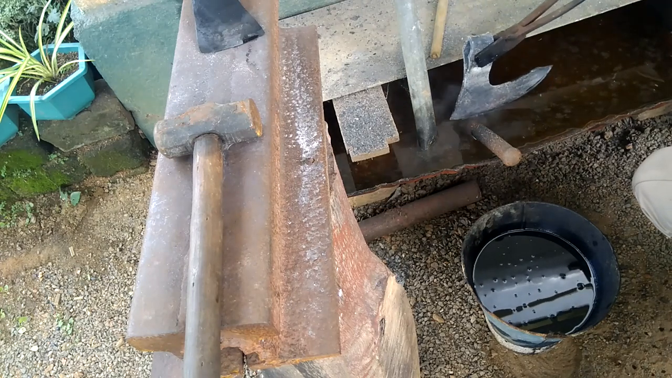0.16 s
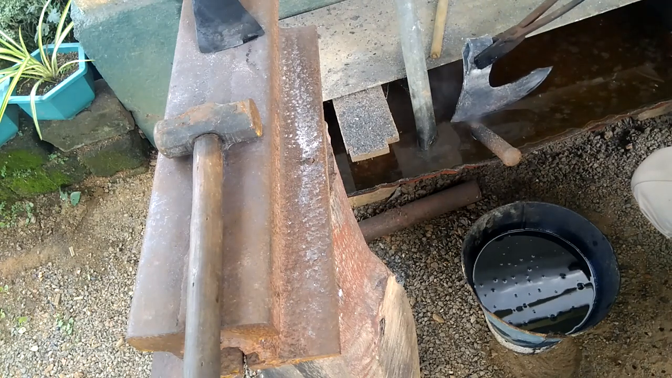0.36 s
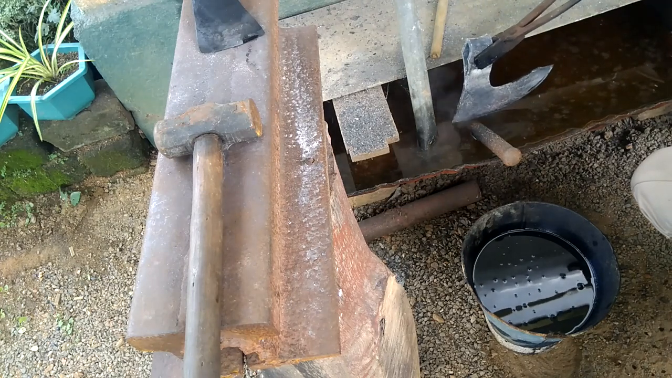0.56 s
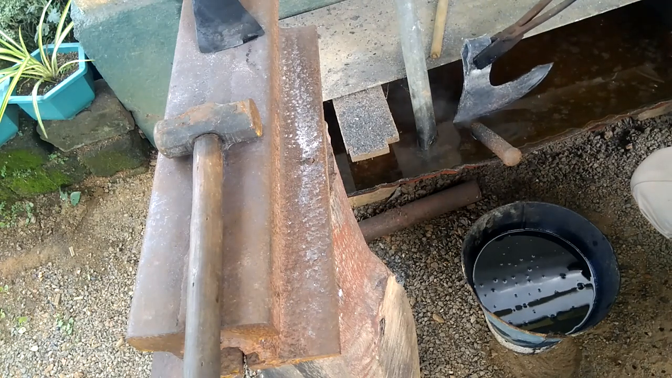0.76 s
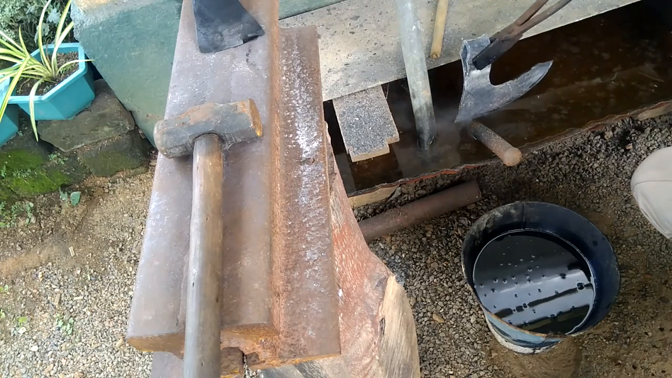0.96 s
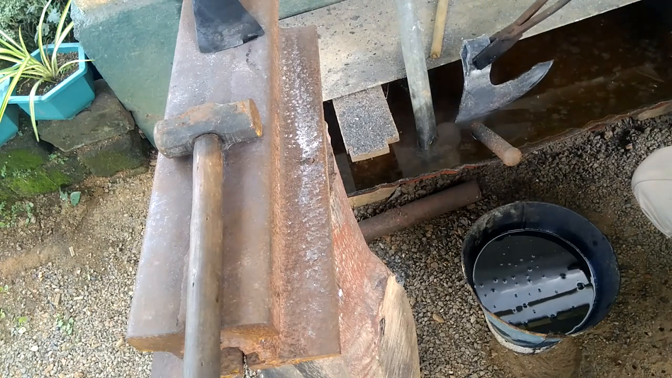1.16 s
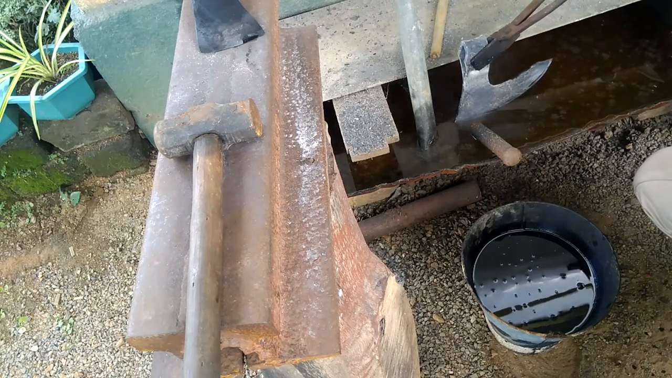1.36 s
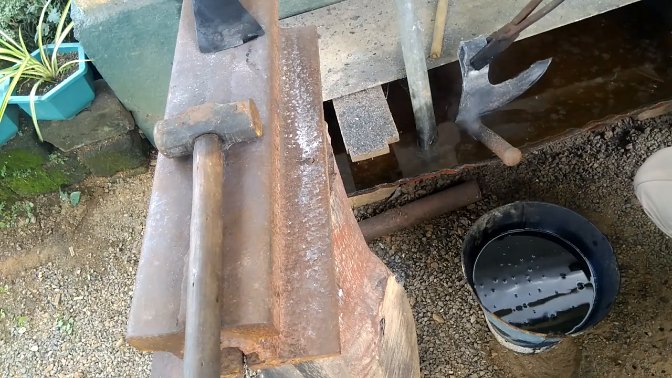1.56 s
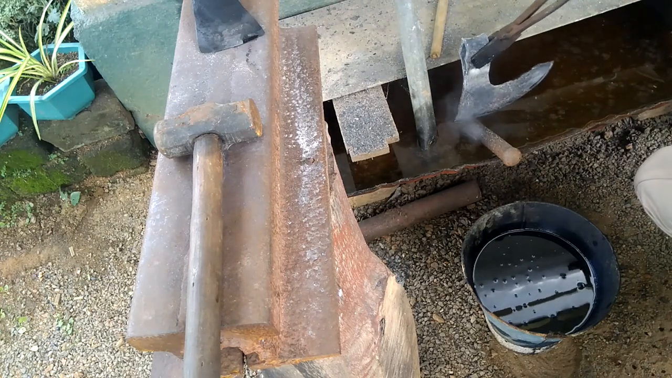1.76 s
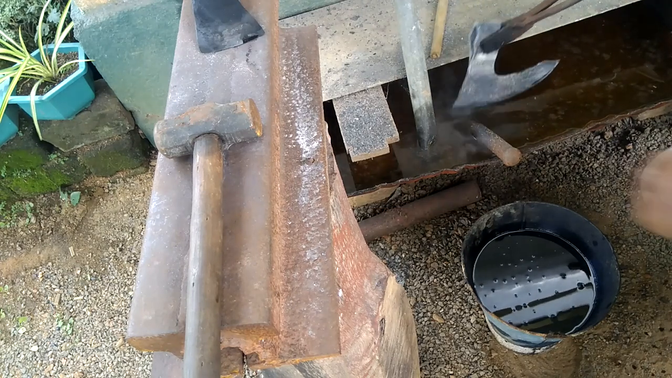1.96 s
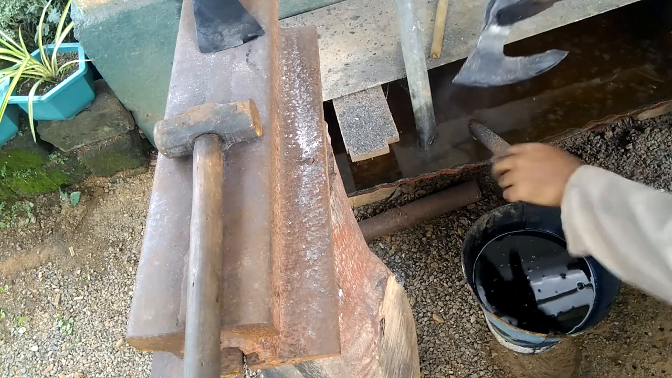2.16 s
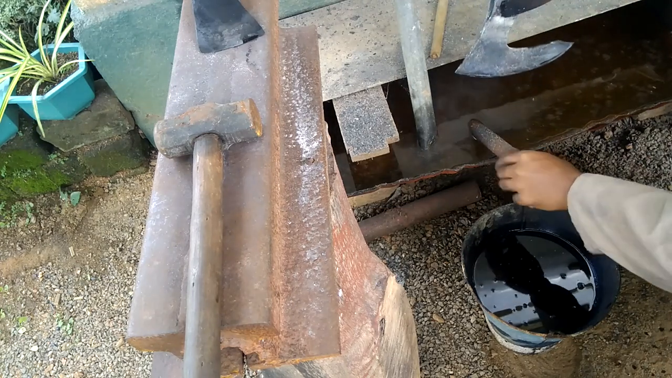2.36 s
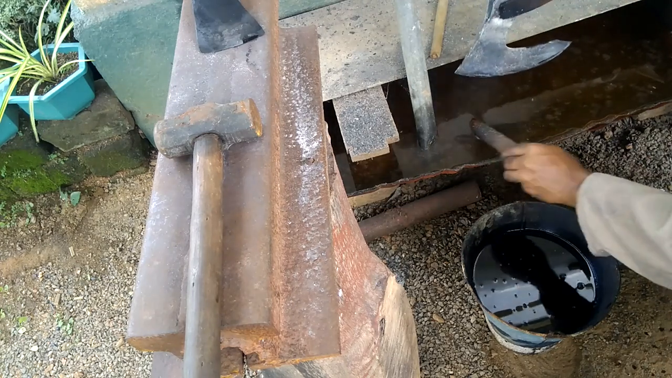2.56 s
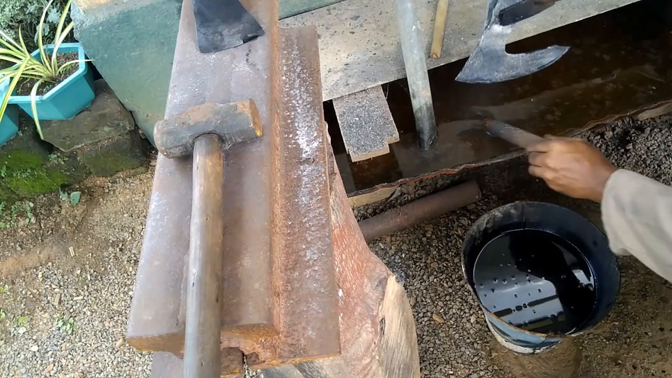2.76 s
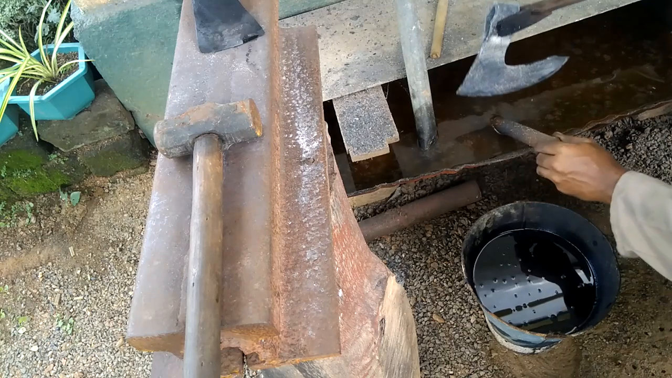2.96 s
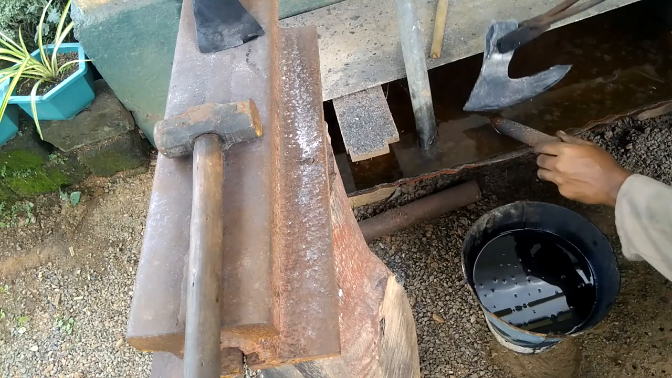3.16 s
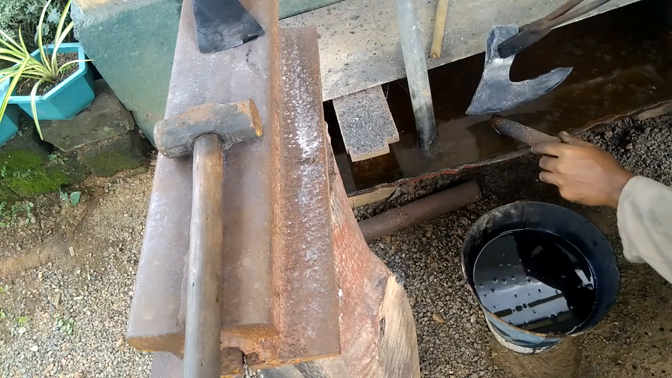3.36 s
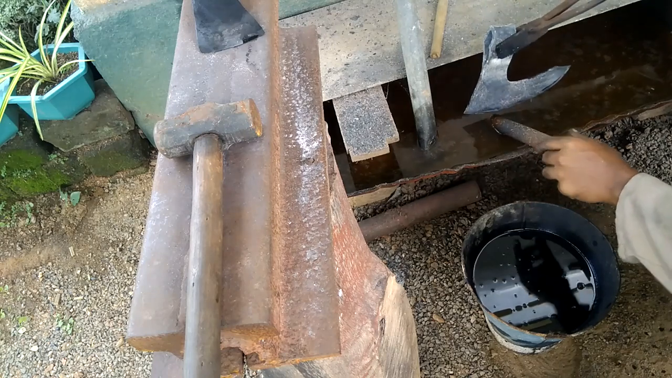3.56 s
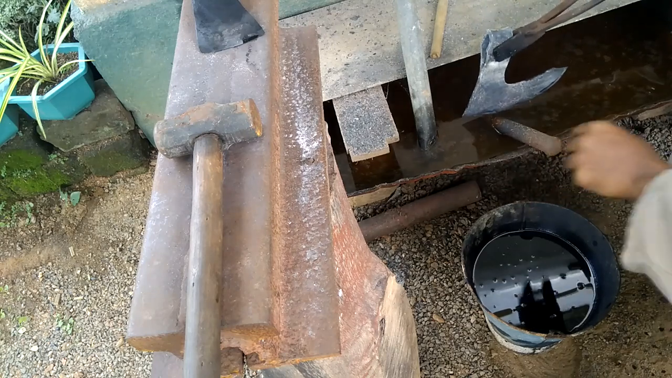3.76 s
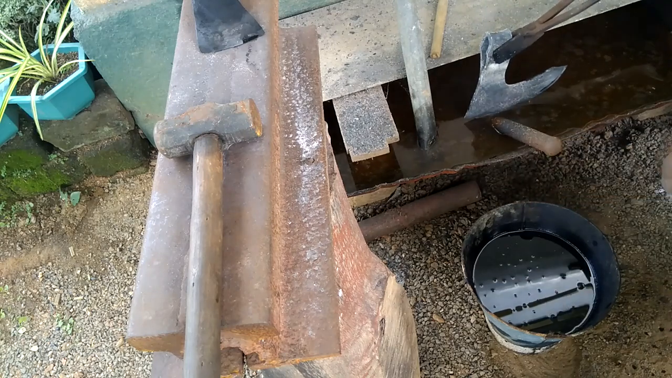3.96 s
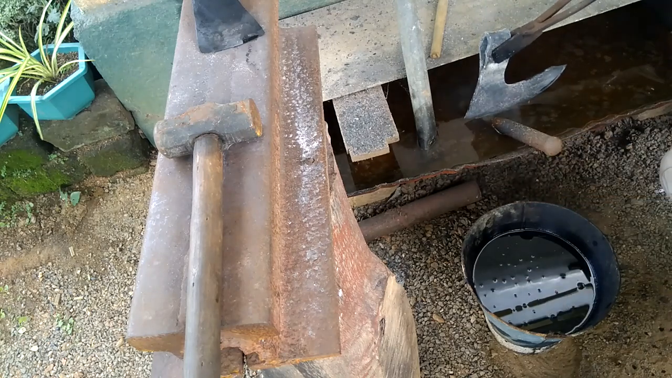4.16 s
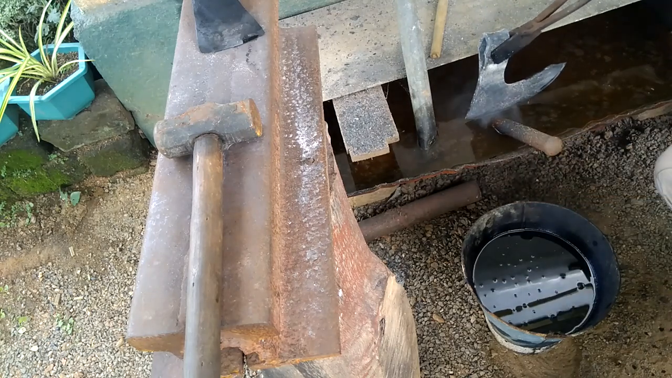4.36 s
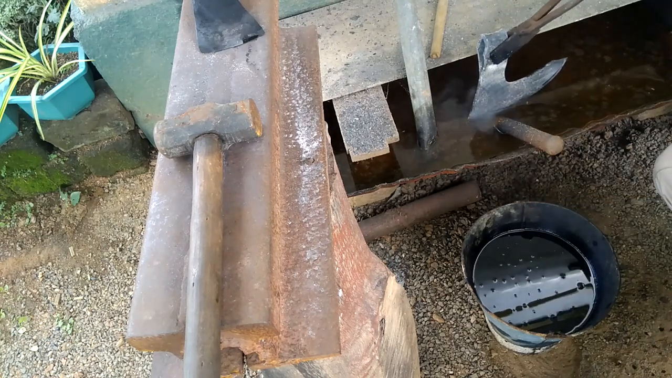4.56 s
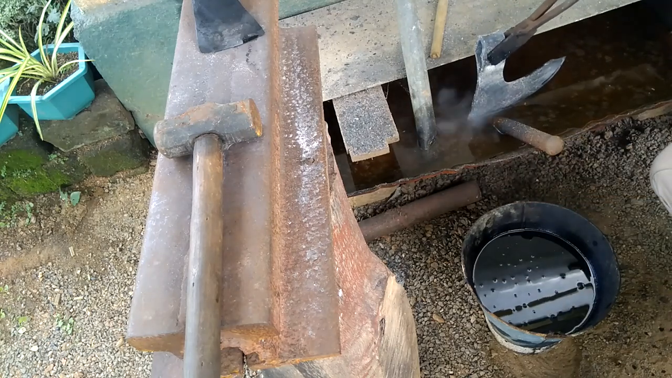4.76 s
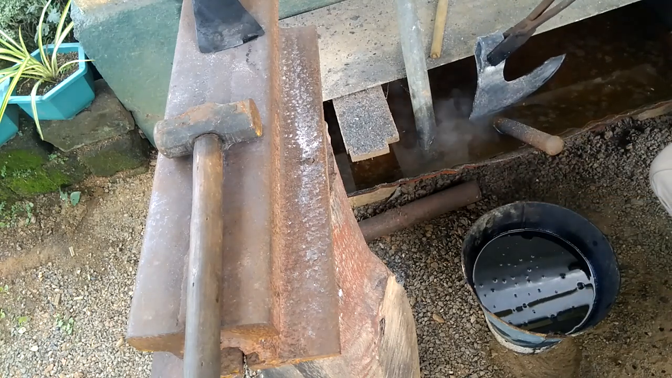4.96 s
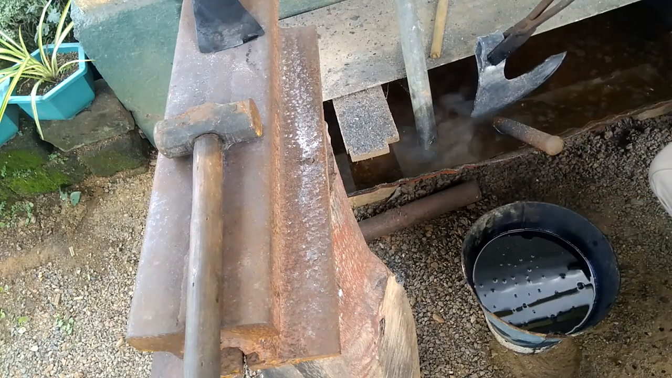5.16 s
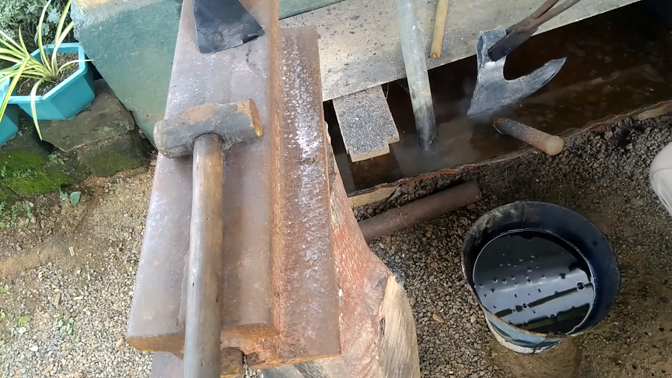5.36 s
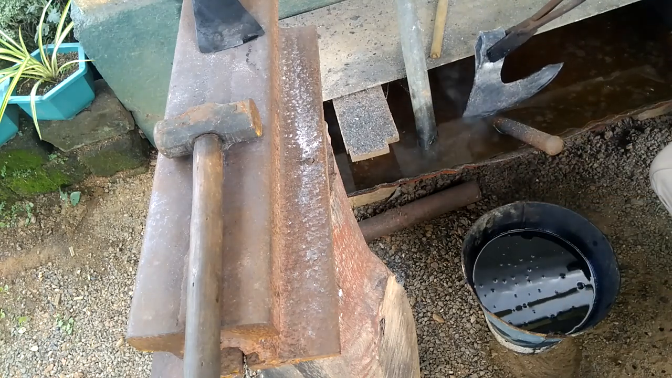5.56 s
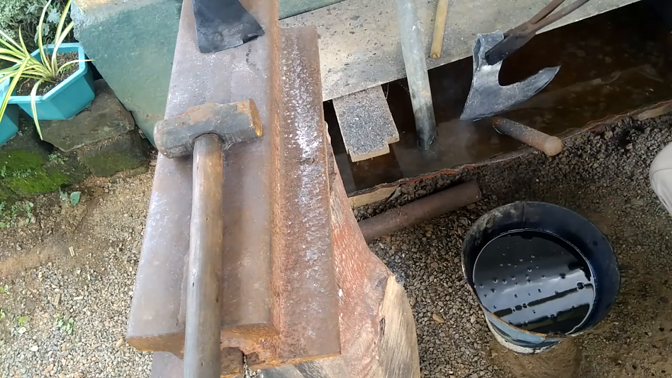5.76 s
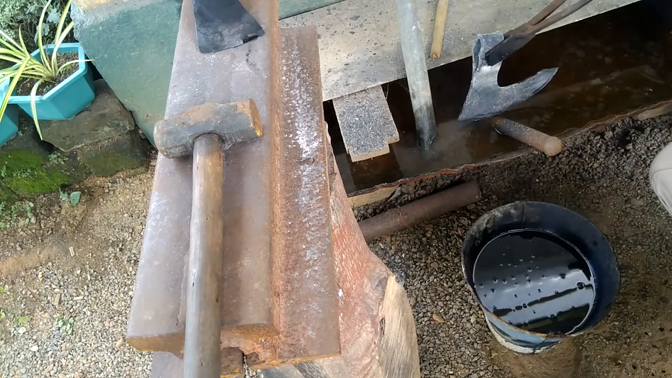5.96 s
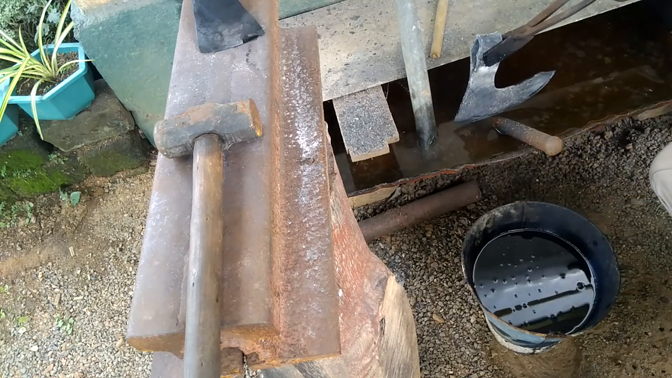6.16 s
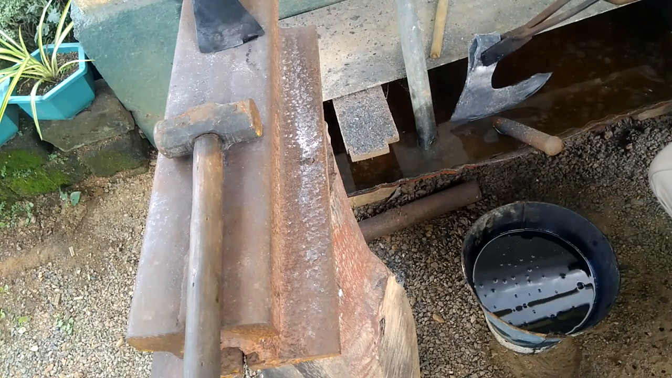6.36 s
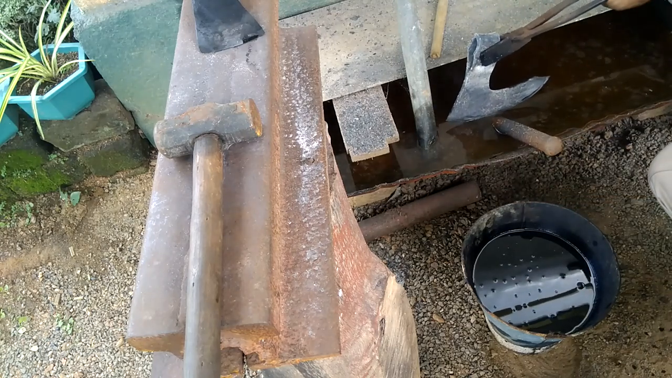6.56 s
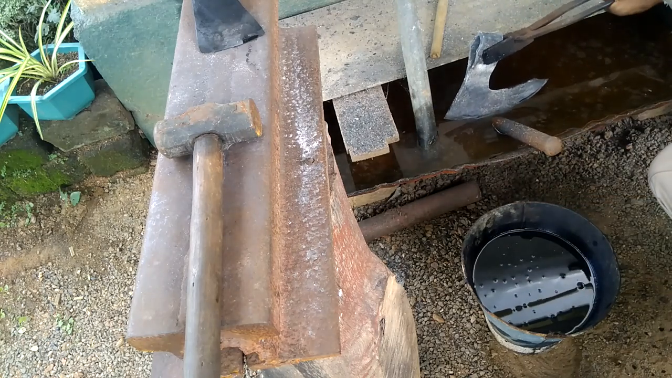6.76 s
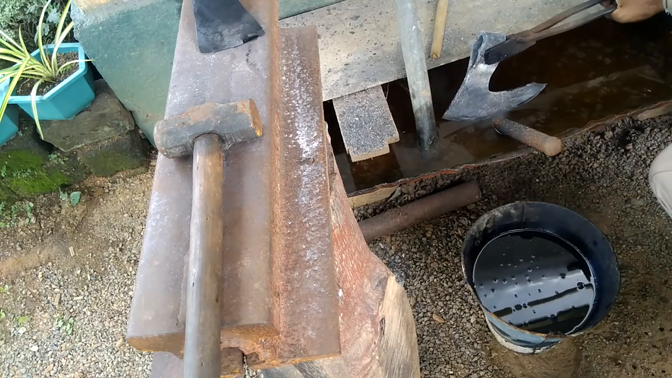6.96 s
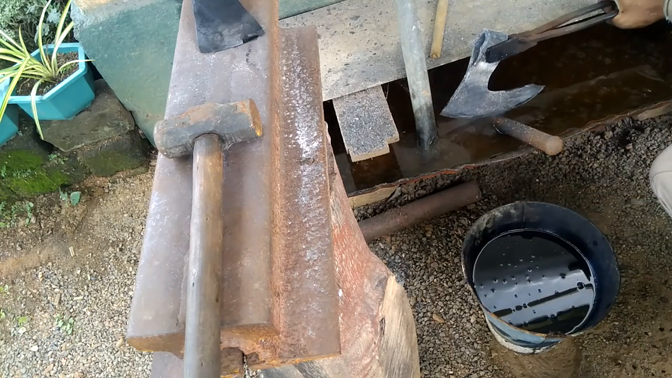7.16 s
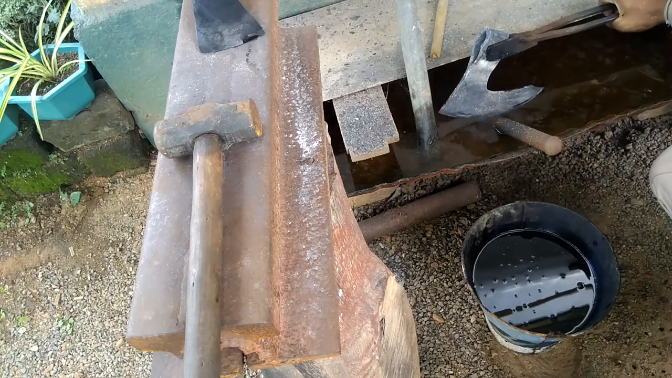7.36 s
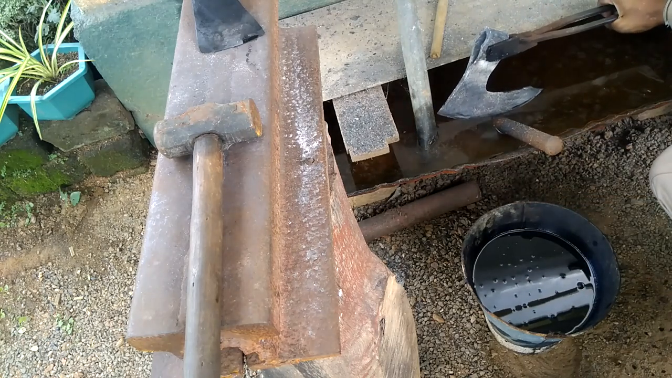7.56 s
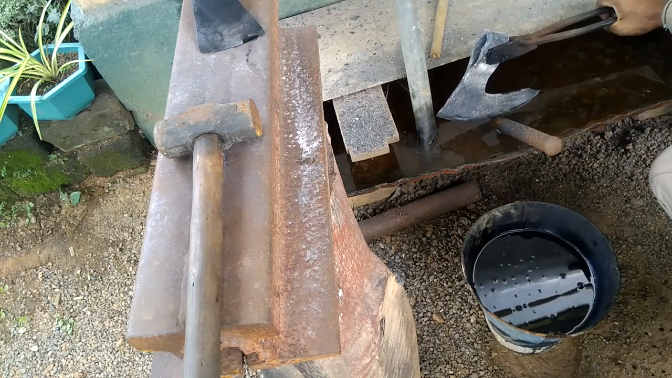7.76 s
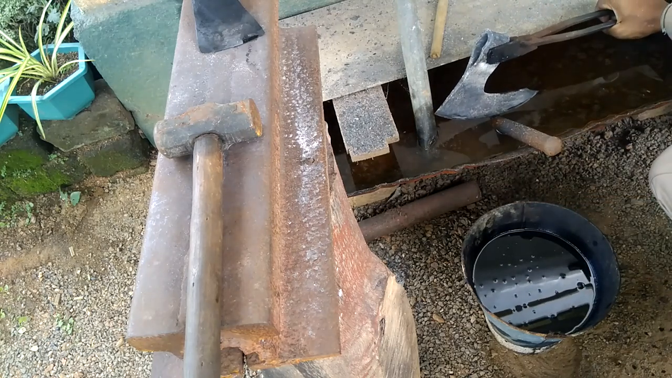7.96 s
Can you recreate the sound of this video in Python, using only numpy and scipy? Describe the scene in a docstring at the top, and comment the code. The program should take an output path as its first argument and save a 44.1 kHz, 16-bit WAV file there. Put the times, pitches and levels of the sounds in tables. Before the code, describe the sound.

Hot steel sizzles in a water trough, fades around a brief wooden rub and glug, then sizzles again, over low wind rumble.

```python
"""An open workshop, one mono microphone close to a water trough. A red-hot axe head is dipped twice:
its edge boils the water, and collapsing steam bubbles make a dense, crackling hiss that stutters now
and then and sings thinly as it dies. Between the dips a wooden handle is dragged through the trough
with a short gurgling rub. Small splashes stir the water, puffs of air rumble on the microphone,
and the faint steady noise of the yard lies behind it all."""
import sys
import numpy as np
from scipy import signal
from scipy.fft import rfft, irfft, next_fast_len
from scipy.io import wavfile
from scipy.ndimage import uniform_filter1d, map_coordinates

SR = 44100
rng = np.random.default_rng(int(sys.argv[2]) if len(sys.argv) > 2 else 0)


def transcribe(u):
    """Save the signal u as a 16-bit wav file named by the first command-line argument.

    u: samples, shape (n,) or (channels, n), limited to [-1, 1]; the rate is SR.
    q: integer samples, one column per channel.
    """
    v = np.clip(np.atleast_2d(u).T, -1, 1)
    q = np.round(v * 32767).astype(np.int16)
    wavfile.write(sys.argv[1], SR, q)


N = 353241

# Strength of the boil through each dip, heard close. Each row: time in seconds, fizz level in dB.
FIRST_BOIL = [(0, -33.5), (0.3, -35), (1.0, -30.5), (1.3, -30.5), (1.7, -32.5), (1.9, -31.5), (2.05, -45.5),
              (2.35, -50.5), (2.58, -55), (2.85, -47.5), (3.03, -58.5), (3.31, -78.5), (3.49, -63),
              (3.59, -76)]
SECOND_BOIL = [(3.76, -65), (3.818, -57.5), (3.838, -38), (3.94, -31), (5.1, -32), (5.36, -28),
               (5.47, -32.5), (5.56, -41.5), (5.75, -44), (6.0, -40), (6.4, -38.0), (6.72, -32), (7.1, -37),
               (7.28, -31.5), (7.47, -34.0), (7.7, -45.5), (8.0, -49)]
# Spectra of tiny (fizz), middling (sizzle) and large (simmer) steam bubbles.
# Each row: frequency in Hz, relative level in dB.
FIZZ_SPECTRUM = [(2800, -26), (3900, 2.5), (5400, 3.5), (7500, 1.5), (10000, 0), (12300, 1.5), (14300, 0),
                 (15800, -2.5)]
SIZZLE_SPECTRUM = [(900, -18), (1080, 0), (1260, -1), (1360, -6), (1460, -0.5), (1660, -1), (1850, 3.5),
                   (2950, 1), (3600, 4), (4600, -57)]
SIMMER_SPECTRUM = [(200, -13), (330, -11.5), (450, 0), (550, 3.5), (720, 1), (850, 2.5), (1000, -0.5),
                   (1250, -30.5)]
FULL_BOIL_DB = -29  # the fizz at a full boil


def boiling():
    """Steam bubbles of three sizes collapse on the steel; returns the hiss and its fizz level in dB."""
    fizz_db, = curves([*FIRST_BOIL, *SECOND_BOIL])
    sizzle_db, simmer_db = bubble_sizes(fizz_db)
    surge_db = 0.12 * wobble(17) + 0.16 * wobble(90)
    fizz = coloured(crackle(rate=2000, spread_db=-0.5, share=0.32), FIZZ_SPECTRUM)
    sizzle = coloured(crackle(rate=1200, spread_db=2.5, share=0.25), SIZZLE_SPECTRUM)
    # the weaker the boiling, the fewer the bubbles and the more uneven their sound
    burble_db = np.clip(2 - 0.25 * (fizz_db + simmer_db + 47.5), 2, 5)
    uneven_db = np.clip(1 + 0.13 * (FULL_BOIL_DB - fizz_db), 1, 5)
    simmer = patchy(coloured(noise(), SIMMER_SPECTRUM), burble_db, size=4)
    hiss = amp(fizz_db + surge_db) * (fizz + amp(sizzle_db) * sizzle + amp(simmer_db) * simmer)
    uneven_hiss = np.std(hiss) * patchy(hiss, uneven_db, size=4)
    return wall_reflections(uneven_hiss), fizz_db


# The edge meets the water. Each entry: time of one dip in seconds; the first is already under way.
QUENCH_S = [-0.9, 3.76]
# Large bubbles. Each entry: base level in one dip, in dB relative to the fizz.
SIMMER_BASE_DB = [-12.5, -16]
SIZZLE_BASE_DB = -5  # the same for middling bubbles, in both dips
SIZZLE_LAG, SIMMER_LAG = 0.3, 0.95  # shares of the fizz's fall that they do not follow
GROW_S, SIZZLE_LATE_DB, SIMMER_LATE_DB = 0.21, 13, 50  # bubbles start tiny: larger ones this far down
SIZZLE_COOLING_DB_PER_S, SIMMER_COOLING_DB_PER_S = 0.96, 3.5  # they get rarer as the steel cools


def bubble_sizes(fizz_db):
    """Sizzle and simmer in dB relative to the fizz: larger bubbles grow late and outlast a full boil."""
    dip = np.searchsorted(QUENCH_S[1:], clock())
    age_s = clock() - np.take(QUENCH_S, dip)
    young = np.exp(-age_s / GROW_S)
    slack_db = np.clip(FULL_BOIL_DB - fizz_db, 0, 7)
    sizzle_db = SIZZLE_BASE_DB + SIZZLE_LAG * slack_db
    sizzle_db -= SIZZLE_LATE_DB * young + SIZZLE_COOLING_DB_PER_S * age_s
    simmer_db = np.take(SIMMER_BASE_DB, dip) + SIMMER_LAG * slack_db
    simmer_db -= SIMMER_LATE_DB * young + SIMMER_COOLING_DB_PER_S * age_s
    return sizzle_db, simmer_db


# Trough walls and ground, near the microphone. Each row: delay in seconds, signed gain.
REFLECTIONS = [(.00073, .14), (.00116, -.2), (.00187, -.036), (.00268, .14), (.00559, .16), (.00627, .27)]


def wall_reflections(hiss):
    """Near surfaces colour the hiss with reflections that blur away in the top treble."""
    soft = uniform_filter1d(hiss, size=2)
    return hiss + sum(gain * np.roll(soft, round(delay * SR)) for delay, gain in REFLECTIONS)


# Brief gaps in the hiss. Each row: middle in seconds, length in seconds.
STUTTERS = [(.241, .012), (.811, .013), (1.089, .048), (1.217, .032), (1.416, .012), (1.786, .014),
            (1.906, .013), (2.204, .017), (2.525, .022), (4.316, .011), (4.36, .018), (4.445, .011),
            (4.491, .033), (4.782, .012), (5.029, .026), (5.059, .013), (5.147, .011), (5.176, .011),
            (5.317, .014), (5.424, .028), (5.575, .012), (5.765, .014), (5.83, .013), (6.962, .013),
            (7.103, .015)]
STUTTER_DB, STUTTER_DB_PER_S = -9, -400  # the longer a stutter, the deeper
GLINT_DB, GLINT_LOW_HZ, GLINT_SPAN_HZ = -1.8, 1200, 13200  # level is relative to the fizz


def stuttering(hiss, fizz_db, tones):
    """In each stutter the hiss drops away and glassy tones glint in the gap, each at its own moment."""
    gain, glints = np.ones(N), np.zeros(N)
    for middle_s, length in STUTTERS:
        near, t = around(middle_s, length + 0.03)
        depth_db = STUTTER_DB + STUTTER_DB_PER_S * length
        gain[near] *= amp(depth_db * flat_top(t, length / 2 + 0.001))
        pitch, phase, strength, moment = rng.random((4, tones, 1))
        hz = GLINT_LOW_HZ + GLINT_SPAN_HZ * pitch ** 1.25
        offset_s = 0.7 * length * (moment - 0.5)
        life = flat_top(t - offset_s, 0.35 * length + 0.009)
        weight = unit(amp(5.6 * strength) / hz ** 0.18) * np.sqrt(2 / tones)  # high tones are weaker
        glints[near] += np.sum(weight * life * np.sin(2 * np.pi * (hz * t + phase)), axis=0)
    return hiss * gain + amp(fizz_db + GLINT_DB) * glints


# Thin pitches in the dying hiss. Each row: centre in Hz, width in Hz, relative level in dB.
SINGING_BANDS = [(1160, 35, -9.5), (2020, 87, -12), (2230, 90, -8.5), (2990, 120, -2.5), (5000, 310, -14)]


def singing():
    """As the second boil dies down, the hiss gathers at a few narrow pitches."""
    def bands(hz):
        return sum(amp(db) * np.exp(-((hz - centre) / (0.6 * width)) ** 2)
                   for centre, width, db in SINGING_BANDS)

    fade_in = envelope(start_s=7.68, length_s=N / SR, attack_s=0.099, release_db_per_s=0)
    return amp(-49.5) * fade_in * unit(filtered(noise(), bands))


# The rasp of wet wood. Each row: frequency in Hz, relative level in dB.
SCRAPE_SPECTRUM = [(100, -29), (250, 8), (650, -6), (780, -5), (930, 0.5), (1250, 1), (1700, -4.5),
                   (2250, -7), (3200, -11.5), (5000, -17), (9000, -30)]
# Water round the handle. Each row: middle in seconds, peak in dB, pitch in Hz, half-length in seconds.
GLUGS = [(2.671, -29.5, 360, 0.034), (2.70, -29, 186, 0.013), (2.779, -26, 183, 0.009),
         (2.801, -35, 541, 0.039), (2.968, -32, 190, 0.02)]
DRAG_START_S, DRAG_SAG_DB_PER_S = 2.581, 19.5
GROAN_DB, SCRAPE_DB = -29, -35  # before the stroke's fade


def handle_drag():
    """The handle slips unevenly along the trough, slowing; the trough groans and the water glugs."""
    slowing = amp(-DRAG_SAG_DB_PER_S * np.maximum(clock() - DRAG_START_S, 0))
    stroke = slowing * envelope(DRAG_START_S, length_s=0.44, attack_s=0.12, release_db_per_s=174)
    slips = crackle(rate=290, spread_db=-2.0, share=0.3)
    glugs = sum(swell(*glug) for glug in GLUGS)
    groan = amp(GROAN_DB) * unit(filtered(slips, trough_response))
    scrape = amp(SCRAPE_DB + 1.9 * wobble(45)) * coloured(slips, SCRAPE_SPECTRUM)
    return stroke * (groan + scrape) + glugs


# The trough's resonances. Each row: centre in Hz, width in Hz, relative level in dB.
TROUGH_MODES = [(182.5, 23, -2), (362, 32, -1), (445, 59, -11), (536, 12, -2.5), (666, 77, -15.5)]


def trough_response(hz):
    """The trough rings in low modes of alternating sign, rolled off above 1100 Hz."""
    modes = sum((-1) ** k * amp(db) * resonance(hz, centre, width)
                for k, (centre, width, db) in enumerate(TROUGH_MODES))
    return modes / (1 + (hz / 1100) ** 4)


# Small splashes and plops in the trough. Each row: start in seconds, level in dB, pitch in Hz,
# attack in seconds, time to fall 60 dB in seconds.
SPLASHES = [(2.235, -54, 750, .002, 0.3), (2.262, -42, 1150, .0006, 0.15), (2.315, -44.5, 880, .003, 0.2),
            (3.187, -54, 1250, .001, .074), (3.522, -59, 776, .004, 0.12), (3.64, -54.5, 2070, 0.023, 0.21),
            (3.909, -44, 193, .002, 0.27), (5.65, -51.5, 643, .004, 0.54), (7.515, -46, 570, 0.0017, 0.054)]


def splashes():
    """Stirred water: each splash is a short burst of noise round its own pitch."""
    out, t = np.zeros(N + SR), np.arange(SR // 4) / SR
    hz = np.fft.rfftfreq(2 * len(t), 1 / SR)
    for start_s, db, pitch_hz, attack_s, t60 in SPLASHES:
        white = rfft(rng.standard_normal(2 * len(t)))
        band = resonance(hz, pitch_hz, width=0.55 * pitch_hz) ** 2
        burst = unit(irfft(white * band))[:len(t)]
        rise = 1 - np.exp(-t / attack_s)
        out[round(start_s * SR):][:len(t)] += amp(db - 60 * t / t60) * rise * burst
    return out[:N]


# Gusts right on the microphone. Each row: start in seconds, length in seconds, level in dB.
GUSTS = [(0, 0.035, -43), (0.183, 0.42, -43.5), (0.395, 0.21, -36), (0.697, 0.19, -36.5),
         (0.926, 0.41, -46.5), (1.393, 0.32, -41), (1.64, .33, -38), (2.291, 0.14, -48),
         (2.614, 0.48, -48.5), (3.198, 0.088, -43), (3.453, 0.14, -42), (3.92, 0.23, -51),
         (4.4, 0.12, -49.5), (4.926, .17, -37), (5.168, 0.34, -40), (5.638, 0.14, -44), (6.27, 0.41, -46.5),
         (6.684, 0.17, -32), (6.903, 0.11, -41.5), (7.655, 0.3, -47.5)]
# Their low rumble and their rougher top, the buffet. Each row: frequency in Hz, relative level in dB.
RUMBLE_SPECTRUM = [(20, -35), (35, -24), (52, 1.5), (78, 4), (120, -2.5), (170, -7), (230, -16.5),
                   (320, -39.5), (600, -42.5)]
BUFFET_SPECTRUM = [(150, -5), (240, -3), (340, -1.5), (450, -9.5), (700, -26)]
CALM_DB = -57.5  # the flow between gusts
BUFFET_DB, HARD_GUST_DB = -51.5, -31  # the buffet's level in a gust this hard


def gusts():
    """Air flows over the microphone: a lumpy rumble that swells and brightens with each gust."""
    swells = [amp(db) * envelope(start_s, length_s, attack_s=0.022, release_db_per_s=130)
              for start_s, length_s, db in GUSTS]
    flow = np.maximum(np.max(swells, axis=0), amp(CALM_DB)) * amp(3 * wobble(28))
    rumble = flow * coloured(noise(), RUMBLE_SPECTRUM)
    hardness = (flow / amp(HARD_GUST_DB)) ** 1.63  # the buffet grows faster than the rumble
    buffet = amp(BUFFET_DB) * hardness * coloured(noise(), BUFFET_SPECTRUM)
    return rumble + buffet


# Single puffs on the microphone. Each row: middle in seconds, peak in dB, pitch in Hz.
PUFFS = [(0.351, -26, 90), (.441, -24, 115), (.478, -18.5, 105), (0.757, -23, 127), (0.797, -22.5, 82),
         (0.872, -31, 94), (1.26, -26.5, 97), (1.672, -22, 112), (1.721, -23, 80), (1.81, -26, 85),
         (1.957, -16.5, 135), (2.41, -35.5, 65), (2.995, -27, 98), (3.238, -28, 110), (3.288, -31.5, 98),
         (4.08, -34, 75), (4.952, -28.5, 96), (5.052, -25, 77), (5.245, -21, 135), (5.32, -26, 106),
         (5.492, -19, 120), (6.285, -27, 105), (6.406, -24.5, 86), (6.47, -32, 75), (6.565, -23.5, 137),
         (6.761, -20.5, 106), (6.85, -25, 133), (6.999, -25, 102), (7.69, -32.5, 90), (7.805, -25.5, 107),
         (7.93, -36, 80)]


def puffs():
    """Each puff of air pushes the diaphragm once or twice."""
    return sum(swell(middle_s, db, hz, half_length_s=0.56 / hz) for middle_s, db, hz in PUFFS)


def yard():
    """The faint steady background of the open workshop, mostly a low rumble."""
    spectrum = [(40, 7), (150, 8.5), (350, -23), (1000, -13.5), (4000, -41), (14000, -45)]
    return amp(-69.5) * coloured(noise(), spectrum)


def amp(db):
    """Decibels to gain."""
    return np.exp(np.asarray(db) * (np.log(10) / 20))


def unit(x):
    """x at rms 1."""
    return x / np.sqrt(np.mean(x ** 2) + 1e-20)


def clock():
    """The time of every sample in seconds."""
    return np.arange(N) / SR


def curves(rows):
    """One value per sample for each column after the time."""
    times, *columns = np.transpose(rows)
    return [np.interp(clock(), times, column) for column in columns]


def noise():
    """White noise."""
    return rng.standard_normal(N)


def wobble(rate):
    """A smooth random curve, rate knots a second."""
    knots = rng.standard_normal(int(N * rate / SR) + 4)
    coarse = clock()[::32]
    return np.interp(clock(), coarse, map_coordinates(knots, [coarse * rate]))


def crackle(rate, spread_db, share):
    """Uneven random pops, rate a second, carry a share of the power over a bed of countless weak ones."""
    bed, pops = noise(), np.zeros(N)
    at = np.flatnonzero(rng.random(N) < rate / SR)
    pops[at] = np.sign(bed[at - 2]) * amp(spread_db * np.clip(bed[at - 1], -2, 2))
    return np.sqrt(share) * unit(pops) + np.sqrt(1 - share) * bed[::-1]


def filtered(x, response):
    """x through a complex response of frequency."""
    size = next_fast_len(N + SR // 4)
    return irfft(rfft(x, size) * response(np.fft.rfftfreq(size, 1 / SR)), size)[:N]


def coloured(x, points):
    """x shaped by a (Hz, dB) spectrum, closed at both ends, at rms 1."""
    freqs, db = np.transpose(points)
    freqs, db = np.r_[freqs[0] / 2, freqs, freqs[-1] * 2], np.r_[-120, db, -120]
    return unit(filtered(x, lambda hz: amp(np.interp(np.log(hz + 1), np.log(freqs), db))))


def resonance(hz, centre, width):
    """The response of one damped mode."""
    return 1j * hz * width / (centre ** 2 - hz ** 2 + 1j * hz * width)


def patchy(x, depth_db, size):
    """x at rms 1 with drifting bright and dark patches in its spectrum; the depth may be a curve."""
    _, t, spectra = signal.stft(x.astype(np.float32), SR, nperseg=1024)
    patches = uniform_filter1d(rng.standard_normal(spectra.shape), size, axis=0)
    patches = uniform_filter1d(patches, 2 * size, axis=1)
    depth_db = np.interp(t, clock(), depth_db * np.ones(N))
    gain = amp(depth_db * unit(patches) - depth_db ** 2 * np.log(10) / 20)  # keeps the mean power
    return unit(signal.istft(spectra * gain.astype(np.float32), nperseg=1024)[1][:N])


def around(middle_s, reach_s):
    """The samples within reach of a moment, and their times counted from it."""
    near = np.arange(max(int((middle_s - reach_s) * SR), 0), min(int((middle_s + reach_s) * SR), N))
    return near, near / SR - middle_s


def flat_top(t, half_length_s):
    """A soft-edged window round t = 0."""
    return 1 / (1 + (np.abs(t) / half_length_s) ** 6)


def swell(middle_s, db, hz, half_length_s):
    """A few cycles of one pitch that swell and fade."""
    out = np.zeros(N)
    near, t = around(middle_s, np.pi * half_length_s)
    out[near] = amp(db) * np.exp(-(t / half_length_s) ** 2) * np.sin(2 * np.pi * (hz * t + rng.random()))
    return out


def envelope(start_s, length_s, attack_s, release_db_per_s):
    """A gain that rises smoothly, holds until length_s after its start, then dies away."""
    t = clock() - start_s
    rise = np.sin(np.pi / 2 * np.clip(t / attack_s, 0, 1)) ** 2
    return rise * amp(-release_db_per_s * np.clip(t - length_s, 0, 2))


def scene():
    """The trough up close, air on the microphone and the yard behind, alike in both channels."""
    hiss, fizz_db = boiling()
    trough = stuttering(hiss, fizz_db, tones=24) + handle_drag() + splashes() + singing()
    mono = trough + gusts() + puffs() + yard()
    return np.array([mono, mono])


BAND_LIMIT_HZ = 15850


def record(dry):
    """The mono recorder keeps nothing above its band limit."""
    mono = filtered(dry.mean(axis=0), lambda hz: hz < BAND_LIMIT_HZ)
    return np.array([mono, mono])


dry = scene()
out = record(dry)
transcribe(out)
```